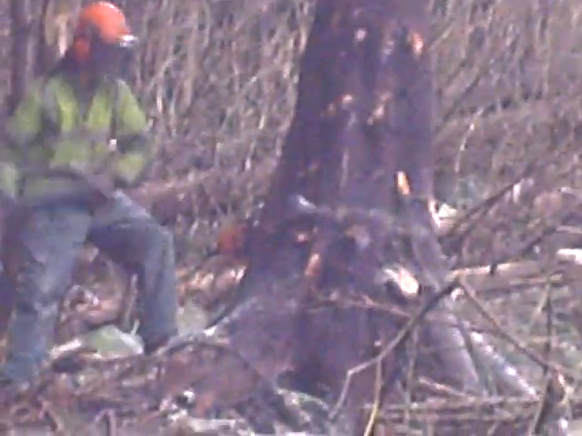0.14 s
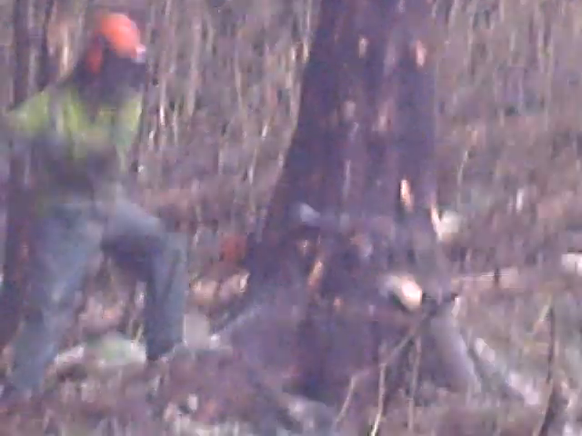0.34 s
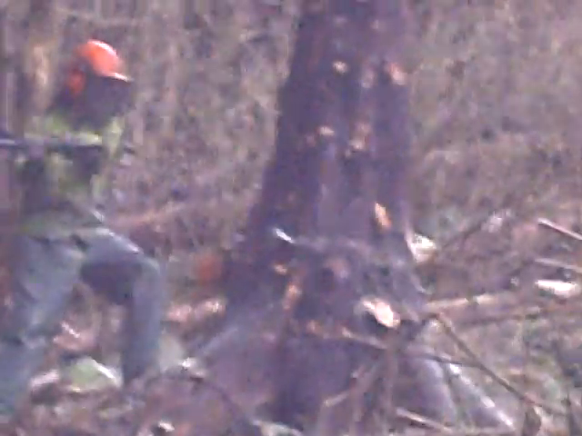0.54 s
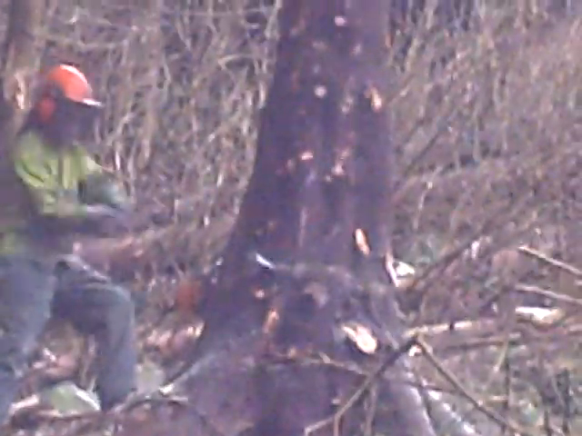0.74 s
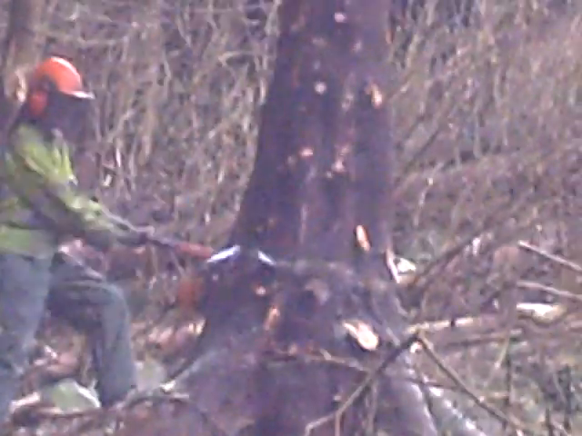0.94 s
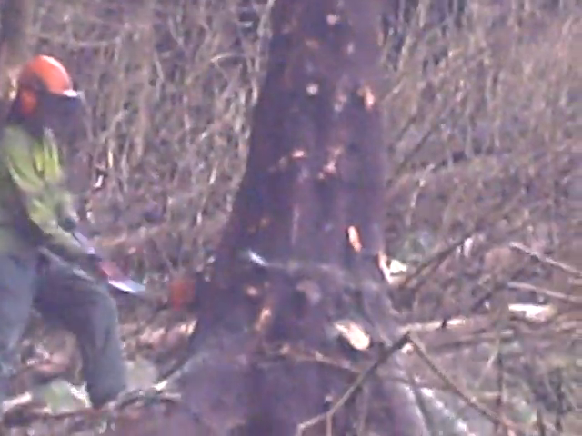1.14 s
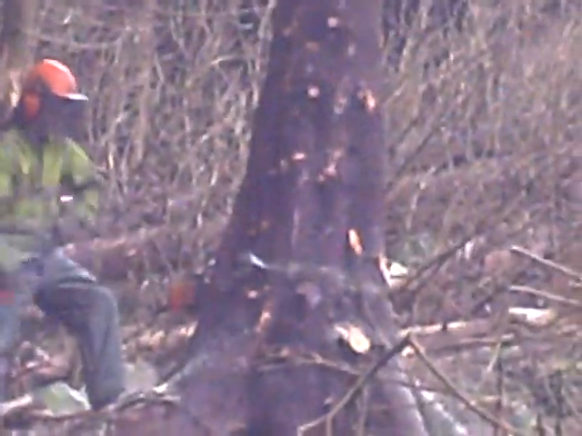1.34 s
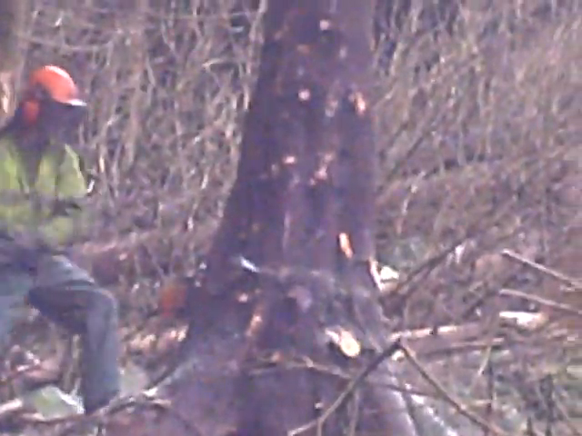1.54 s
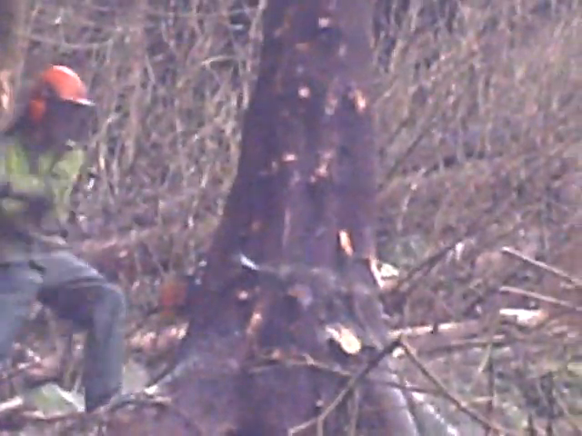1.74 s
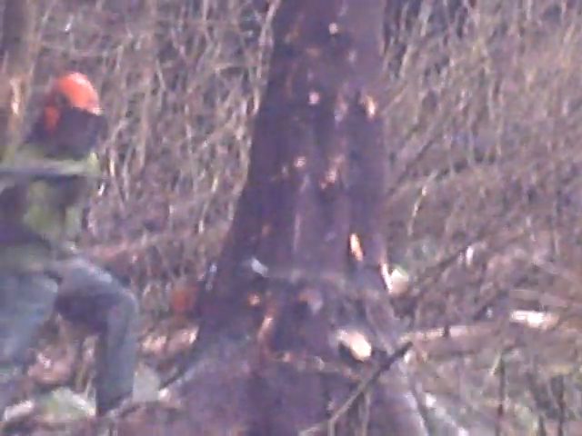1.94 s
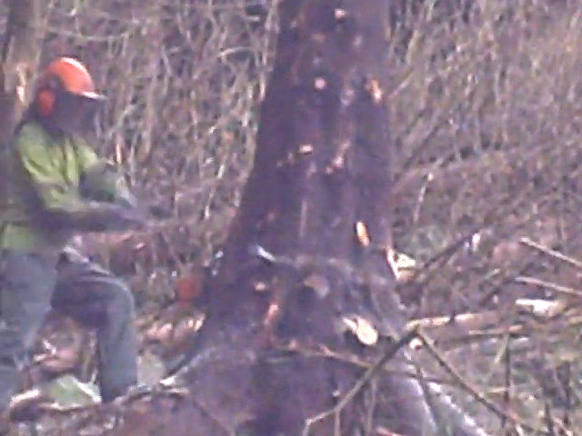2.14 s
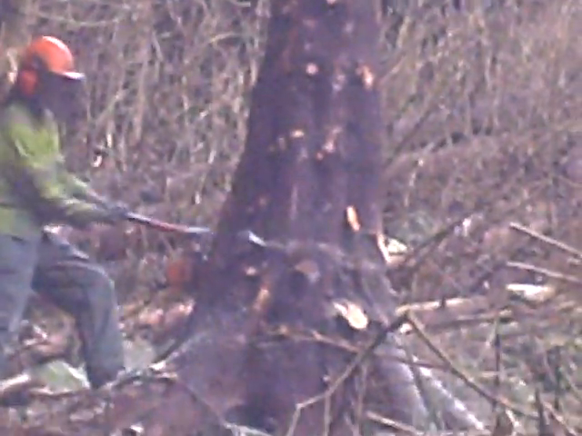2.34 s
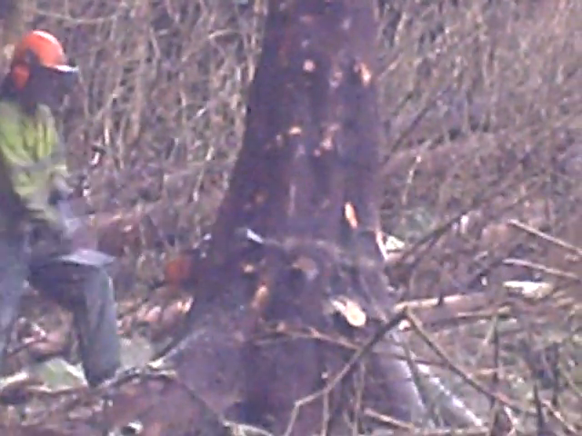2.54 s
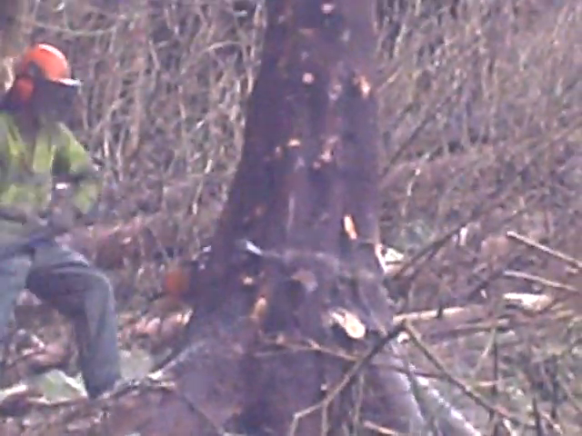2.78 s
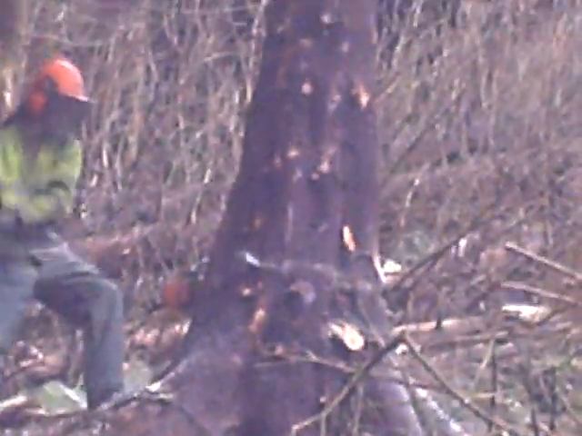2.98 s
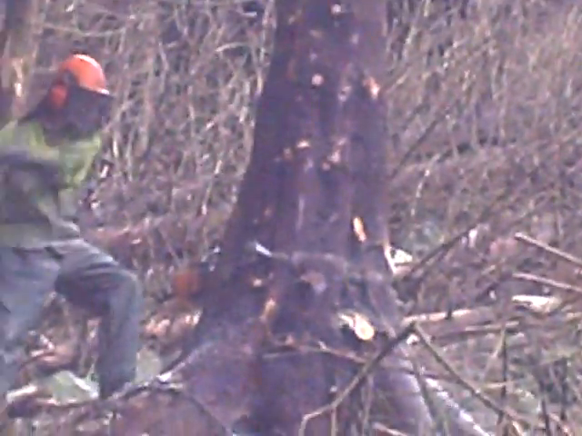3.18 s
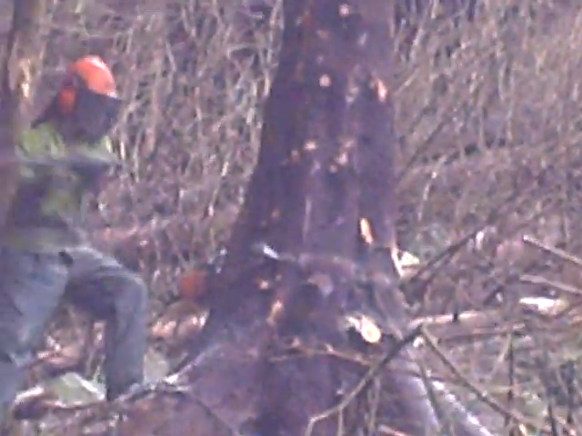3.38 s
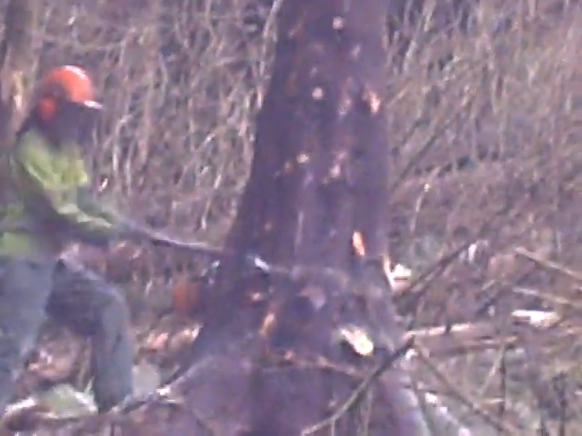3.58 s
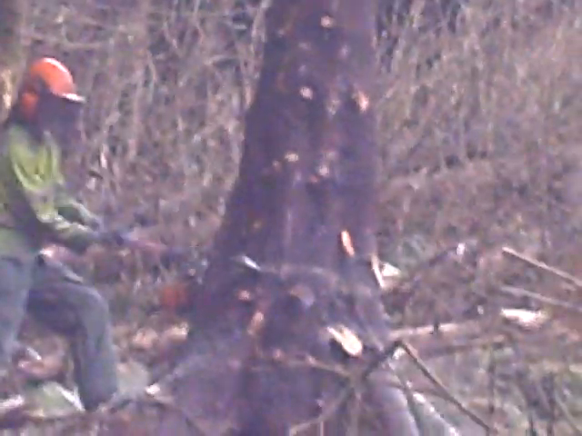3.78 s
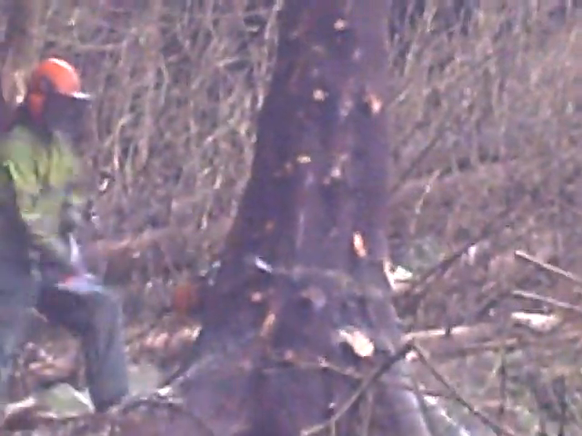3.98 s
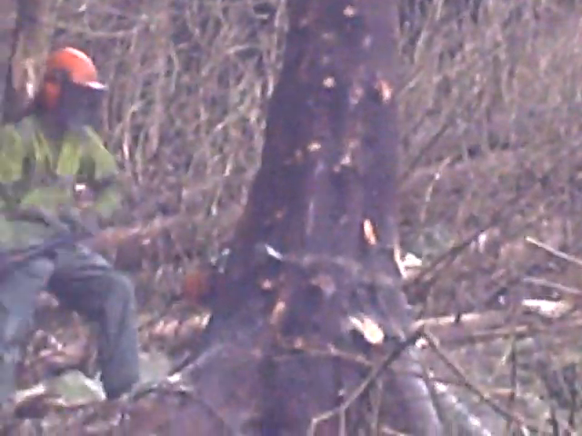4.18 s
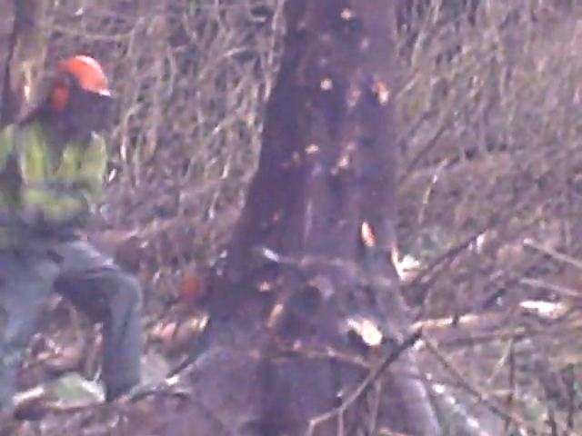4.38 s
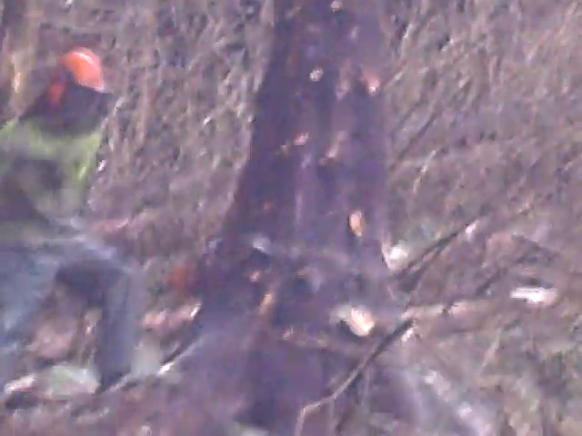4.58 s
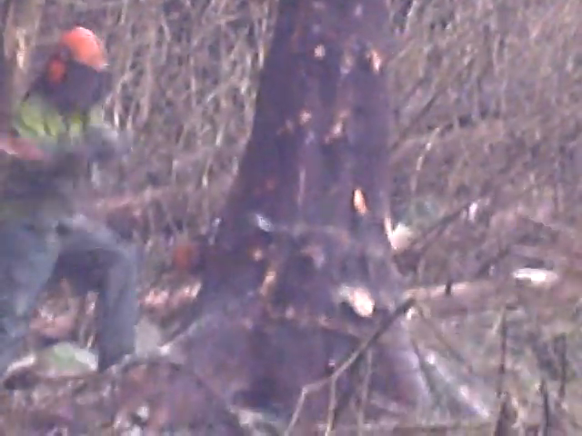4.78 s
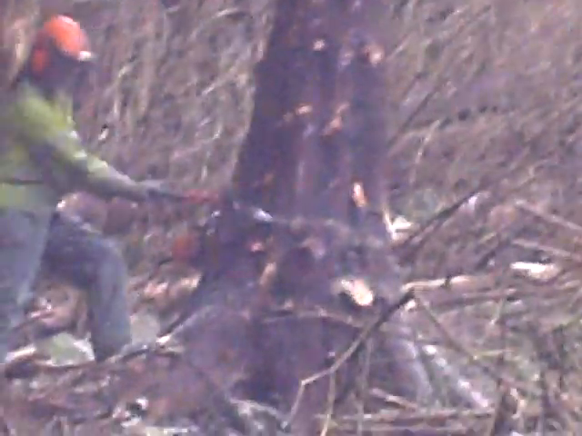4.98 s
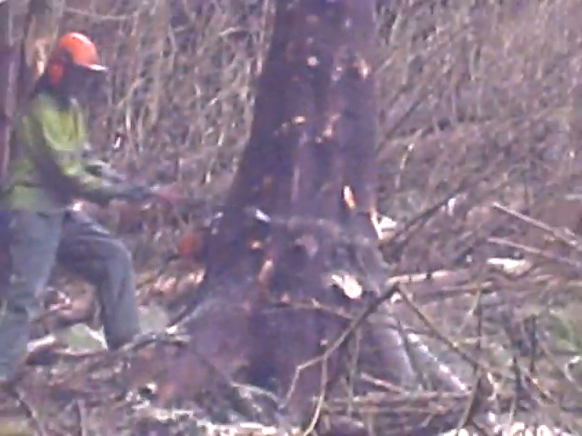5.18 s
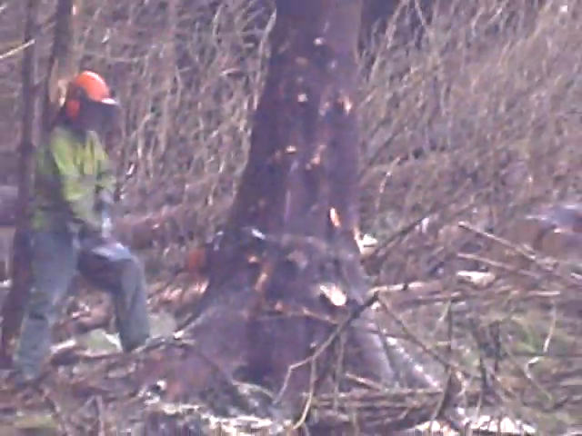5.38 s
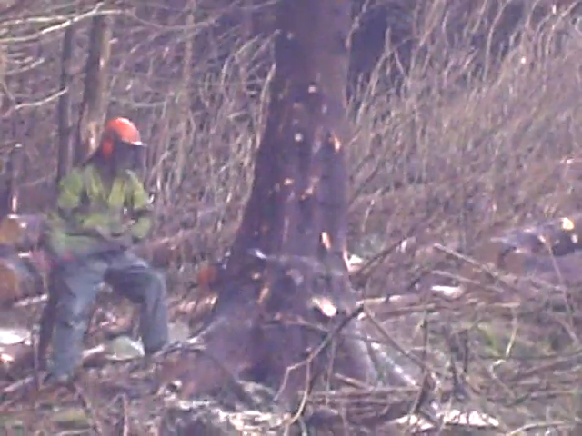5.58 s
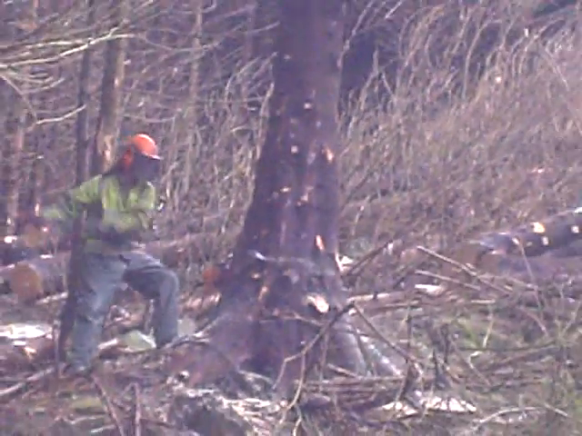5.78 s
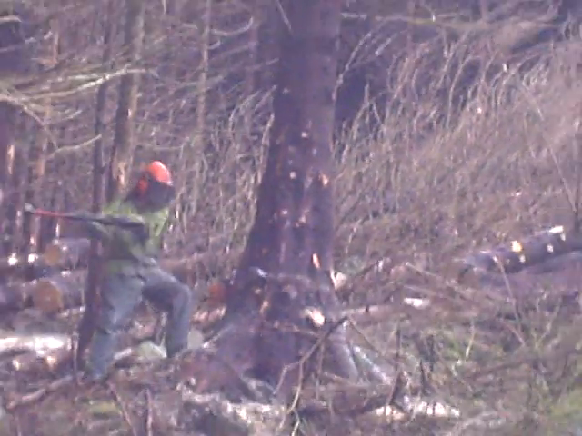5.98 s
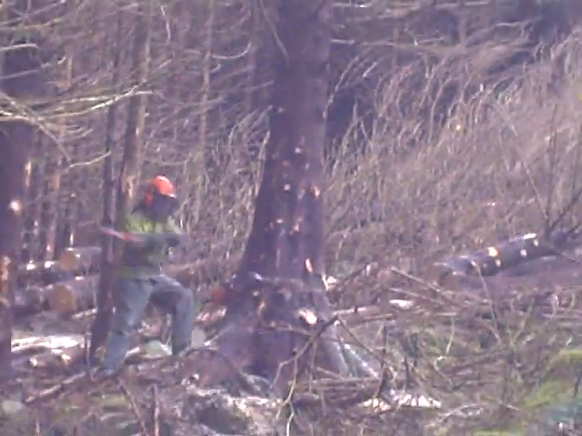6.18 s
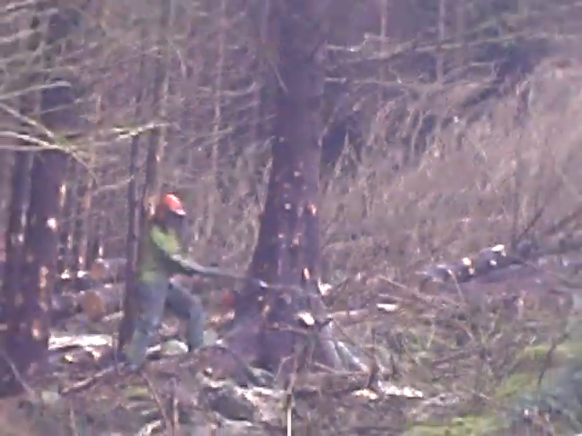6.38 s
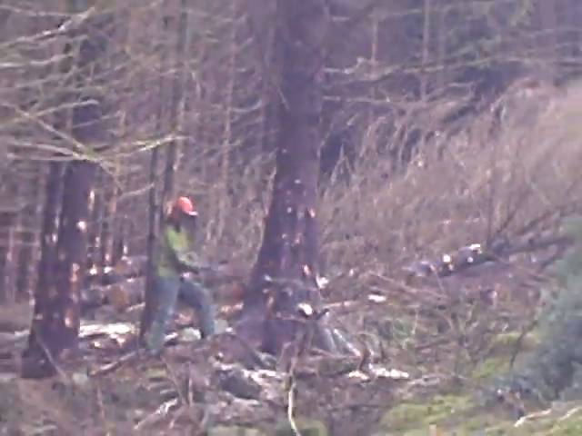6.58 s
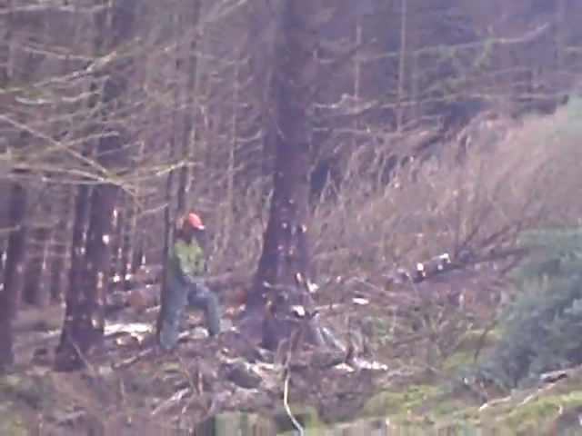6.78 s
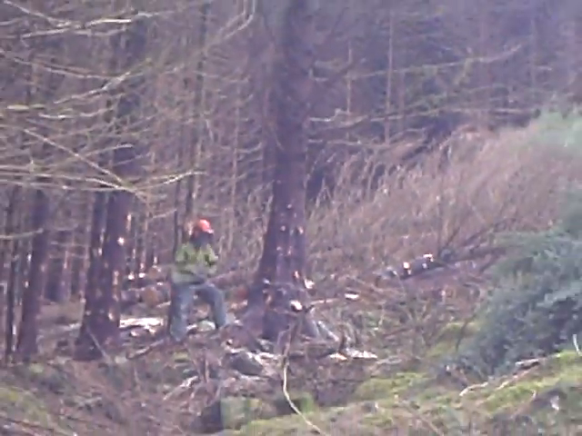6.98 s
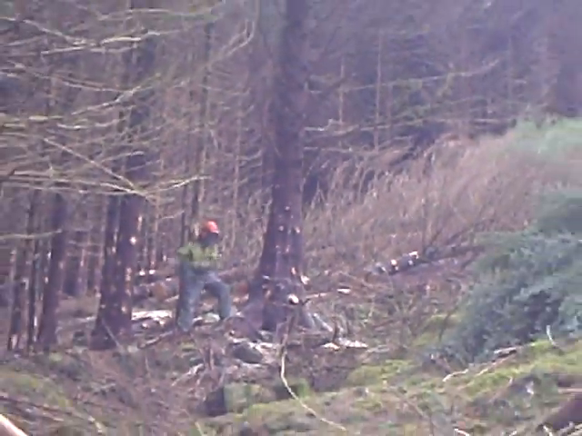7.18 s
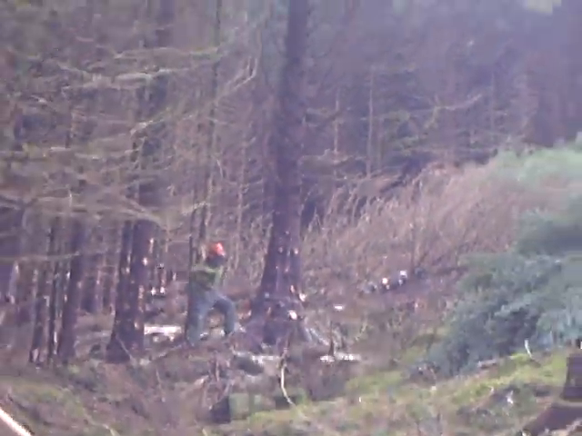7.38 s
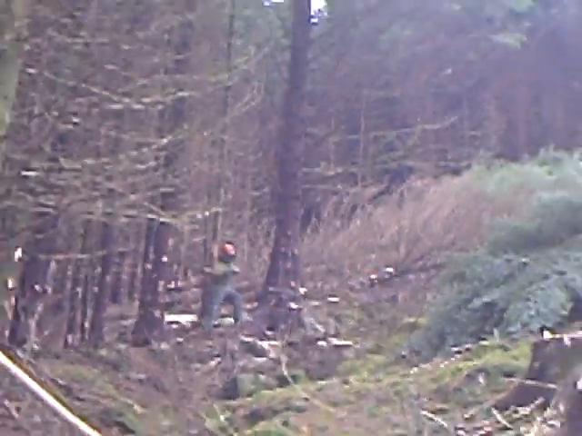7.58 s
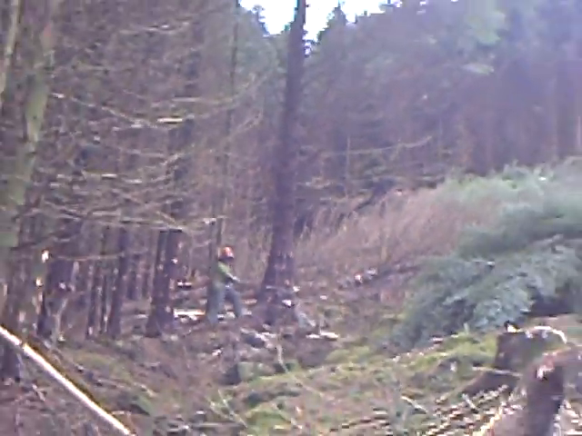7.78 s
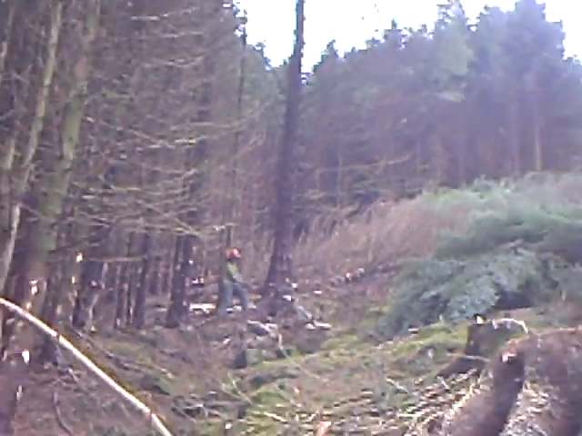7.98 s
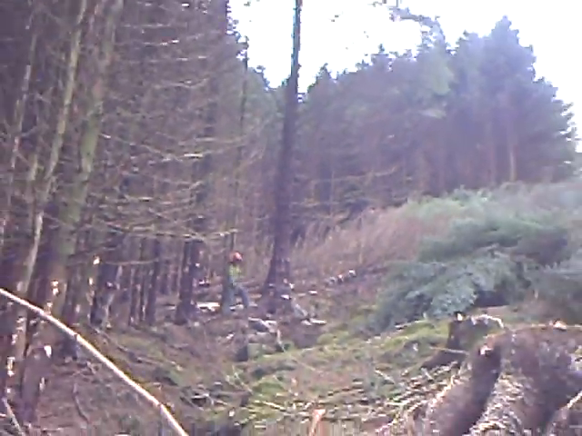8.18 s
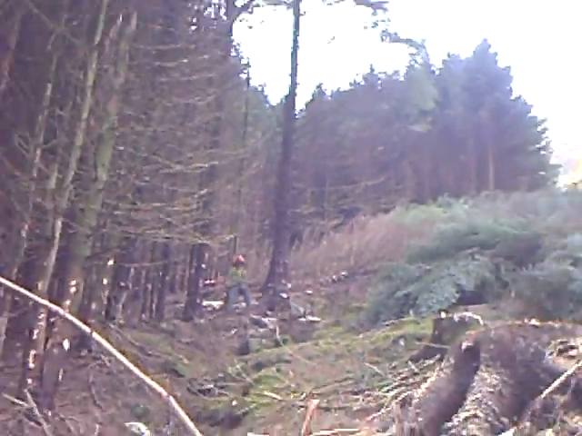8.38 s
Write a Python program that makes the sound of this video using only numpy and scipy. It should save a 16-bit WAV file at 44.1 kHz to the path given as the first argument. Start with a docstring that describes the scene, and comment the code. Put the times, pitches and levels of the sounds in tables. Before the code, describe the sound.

Six steady hammer blows clink on a steel wedge in a tree, echoing through the forest over a faint engine hum and an idling chainsaw.

```python
"""Felling wedge on a wooded hillside

Close to the microphone, a forester drives a wedge into a conifer: six steady hammer blows, loud
enough to overload it. Each is a short steel clink over a woody crack, scattered back by the trunks;
dull far echoes follow the fourth and sixth. Beneath them an engine hums far off, an idling saw jingles
its chain, and a light breeze moves the trees, with soft low rustles early on, a tick and a faint whine."""
import sys
import numpy as np
from scipy import signal
from scipy.fft import rfft, irfft, next_fast_len
from scipy.io import wavfile
from scipy.ndimage import map_coordinates

SR = 44100
rng = np.random.default_rng(int(sys.argv[2]) if len(sys.argv) > 2 else 0)


def store_wav(level_fs):
    """Save 16-bit WAV to argv[1]."""
    pcm = np.round(np.clip(np.atleast_2d(level_fs), -1, 1) * 32767)
    wavfile.write(sys.argv[1], SR, pcm.T.astype(np.int16))


N = 371763
TIME = np.arange(N) / SR


def hammer(ring_t60=0.06, clank_t60=0.023, knock_t60=0.043, grip_t60=0.081):
    """Close by, each blow cracks the wood and rings the steel; where it lands picks the top tones."""
    # the blows: (time [s], strength [dB], ring [Hz], clank [Hz], trunk knock [Hz],
    # then relative levels: ring [dB], clank [dB], low ring [dB], knock [dB])
    blows = [(1.0605, -4.5, 5910, 4163, 2027, -5, -0.5, -24.5, -7.5),
             (2.421, -3.5, 5280, 4190, 1340, -3, -7, -12, -11),
             (3.797, -3.5, 5260, 4540, 253, -9, -9, -11.5, -13.5),
             (5.1573, -3.5, 5350, 4700, 720, -10, -3, -10, -13),
             (6.547, -3.5, 5180, 4246, 1400, 1, -10.5, -10, -8),
             (7.9436, -3, 5184, 4330, 388, -2, -12.5, -8, -12.5)]
    # modes of hammer head and wedge: (frequency [Hz], relative level [dB], ungripped t60 [s])
    steel_modes = [(1597, -15.5, 0.028), (2010, -28.5, 0.046), (3980, -17, 0.066), (4180, -9, 0.035),
                   (4616, -9, 0.033), (5056, -10.5, .04), (5550, -13, 0.052), (5630, -9.5, 0.044),
                   (7040, -16.5, 0.046)]
    # a close pair that grows as the wedge seats: (frequency [Hz], relative level [dB], ungripped t60 [s])
    low_ring = [(2882, -1, 0.057), (3073, -5, 0.044)]
    # wood cracking under the wedge: (frequency [Hz], spectral level [dB])
    crack_spectrum = [(100, -3), (250, -5.5), (700, -4), (1500, -3.5), (2400, -3.5), (3500, -1),
                      (5000, 4.5), (6200, -1), (8000, -1.5)]
    track, t = np.zeros(N), np.arange(SR // 4) / SR
    attack = 1 - np.exp(-t / 0.00023)
    grip = fade(t, grip_t60)  # the wood grips the wedge and stops it quickly
    for s, db, ring_hz, clank_hz, knock_hz, ring_db, clank_db, low_db, knock_db in blows:
        modes = steel_modes + [(ring_hz, ring_db, ring_t60)]
        modes += [(hz, level + low_db, t60) for hz, level, t60 in low_ring]
        steel = amp(5.5) * ring(modes, t)
        clank = amp(13) * ring([(clank_hz, clank_db, clank_t60)], t)
        knock = ring([(knock_hz, knock_db, knock_t60)], t)
        crack = amp(3.5) * noise(crack_spectrum, size=len(t)) * fade(t, 0.065)
        add(track, s, amp(db) * ((steel + clank + crack) * grip + knock) * attack)
        # the trunks return sound sent out in all directions, so their answer is smooth and dense
        colour = lambda hz: np.sqrt(resonances(modes, hz) + amp(along(crack_spectrum, hz) - 29.5) ** 2)
        add(track, s, amp(db + 16.45) * forest_echo(colour))
    return track


def forest_echo(colour, near_db=4.0, near_t60=0.11, spread_db=6):
    """Echoes of uneven size: a quick cluster from the ground and near trunks, then the hillside."""
    # decay among the trees: (frequency [Hz], t60 [s])
    decay_times = [(200, 0.56), (1000, 0.52), (3000, 0.54), (5000, 0.45), (8000, 0.45)]
    size = SR * 3 // 4
    t = np.arange(size) / SR
    reflections = unit(rng.standard_normal(size) * amp(spread_db * rng.standard_normal(size)))
    hz, frame_times, bands = signal.stft(filtered(reflections, colour), SR, nperseg=256)
    decay = fade(frame_times, along(decay_times, hz)[:, None])
    hillside = signal.istft(bands * decay, SR, nperseg=256)[1][:size]
    near_boost = 1 + amp(near_db) * fade(t, near_t60)
    return hillside * near_boost * (1 - np.exp(-t / 0.00059))


def far_engine(firing_hz=70, drift=0.00817, rumble_db=-40.5):
    """An engine far off at a steady speed: low firing orders, a rumble and fluttering machine tones."""
    # its hum at the microphone: (time [s], level [dB])
    hum_levels = [(0, -36.5), (1.6, -34.5), (5.6, -36.5), (8.43, -36)]
    # firing orders: (multiple of the firing rate, relative level [dB])
    orders = [(1, 0.5), (2, -7.5), (3, -23.5)]
    # faint machine tones: (frequency [Hz], level [dB], flutter [share of pitch])
    machine_tones = [(300.6, -55, .004), (1180, -53, .014)]
    # its rumble: (frequency [Hz], spectral level [dB])
    rumble_spectrum = [(15, -12.5), (28, -6.5), (48, -4), (90, -3.5), (108, -11.5), (120, 4), (150, -2.5),
                       (180, -9.5), (260, -27.5)]
    phase = wavering_phase(firing_hz, drift, rate=4)
    hum = sum(amp(db + 0.5 * k * wobble(4.8)) * np.sin(round(k) * phase) for k, db in orders)
    tones = sum(amp(db + 2 * wobble(8.2)) * np.sin(wavering_phase(hz, flutter, rate=60))
                for hz, db, flutter in machine_tones)
    hum_gain = amp(curve(hum_levels) + 0.4 * wobble(3.3))
    return hum_gain * unit(hum) + tones + amp(rumble_db) * noise(rumble_spectrum)


def idling_saw(idle_hz=48.4, shake_t60=0.04):
    """Every firing shakes the loose chain by a different amount, and it jingles on the bar."""
    # how hard the chain jingles: (time [s], relative level [dB])
    jingle_levels = [(0.0, -42), (1.03, -40.5), (1.43, -39), (1.67, -37.5), (2.32, -42), (2.6, -41),
                     (3.43, -42.5), (3.83, -39), (4.81, -42.5), (7.61, -43), (8.1, -40.5), (8.43, -42)]
    # resonances of chain and bar: (frequency [Hz], width [Hz], relative level [dB])
    bar_modes = [(4212, 58, 4.5), (4400, 170, -2), (4614, 220, -2), (4770, 300, -31), (5660, 210, -13),
                 (6110, 2700, -22.5)]
    turns = wavering_phase(idle_hz, 0.016, rate=8) / (2 * np.pi)
    firings = np.diff(np.floor(turns), prepend=0) * amp(rng.uniform(-5, 5, N))
    t = np.arange(SR // 10) / SR
    jolt = fade(t, shake_t60) * (1 - np.exp(-t / 0.0041))
    shake = signal.fftconvolve(firings, jolt)[:N]
    links = (unit(shake) + 1) * rng.standard_normal(N)  # the jolts ride on a steady rattle
    bar = lambda hz: sum(amp(db) * 1j * hz * width / (centre ** 2 - hz ** 2 + 1j * hz * width)
                         for centre, width, db in bar_modes)
    return amp(curve(jingle_levels) + 1.97 + 1.8 * wobble(8.9)) * unit(filtered(links, bar))


def chain_clinks(taps_per_s=8.3, level_db=-37.5, spread_db=4.5, t60=0.016):
    """Now and then a single link gives the bar a faint bright tap."""
    # one link on the bar: (frequency [Hz], spectral level [dB])
    clink_spectrum = [(1500, -22), (4000, -7.5), (6000, -2), (8000, 5)]
    taps = (rng.random(N) < taps_per_s / SR) * amp(level_db + spread_db * rng.uniform(-1, 1, N))
    decay = fade(np.arange(SR // 20) / SR, t60)
    return signal.fftconvolve(taps, decay)[:N] * noise(clink_spectrum)


def wind(gust_db=-46, gust_follows=0.54, hiss_db=-40.5):
    """One wind strength drives the breeze in the trees and its low gusts, over a steady hiss."""
    # the breeze dies down, then holds: (time [s], level [dB])
    breeze_levels = [(0, -41.5), (1.3, -42), (4.3, -46.2), (8.43, -46)]
    # breeze in the trees, low gusts and hiss, each: (frequency [Hz], spectral level [dB])
    breeze_spectrum = [(200, -16.5), (480, -3), (700, -1), (1000, -1.5), (1200, 0), (1450, -6.5),
                       (1900, -15.5), (3000, -45)]
    gust_spectrum = [(100, -25.5), (170, -1), (250, -0.5), (350, 0.5), (450, -2), (650, -15.5),
                     (1200, -34.5)]
    hiss_spectrum = [(500, -19.5), (1400, -2.5), (1850, 0), (2300, 5.5), (2800, 2.5), (3300, 4.5),
                     (3800, -2), (5000, 6.5), (5900, -1), (8000, -5)]
    breeze_db = curve(breeze_levels)
    breeze = amp(breeze_db + 0.9 * wobble(6)) * noise(breeze_spectrum)
    lift_db = gust_follows * (breeze_db - breeze_db.mean())
    gusts = amp(gust_db + lift_db + 1.16 * wobble(7.4)) * noise(gust_spectrum)
    return breeze + gusts + amp(hiss_db) * noise(hiss_spectrum)


def dry_tick():
    """A small dead knock beside the microphone, too near and weak to raise an echo."""
    # the tick: (time [s], strength [dB])
    ticks = [(5.0429, -8)]
    # its modes: (frequency [Hz], relative level [dB], t60 [s])
    modes = [(380, -20, 0.0074), (840, -6.5, 0.0075), (1200, -5, 0.012), (3640, -9, 0.0075),
             (4560, -8, 0.0062), (6770, -3, 0.0061)]
    track, t = np.zeros(N), np.arange(SR // 20) / SR
    knock = sum(amp(db) * fade(t, t60) * np.cos(2 * np.pi * hz * t) for hz, db, t60 in modes)
    for s, db in ticks:
        add(track, s, amp(db) * knock)
    return track


def rustles_and_far_echoes(width_octaves=0.81):
    """Noise swells: soft low rustles early on, and dull far echoes after the fourth and sixth blows."""
    # three rustles, then two echoes: (time [s], level [dB], band centre [Hz], half length [s])
    swells = [(.516, -38, 199, 0.077), (3.14, -40, 330, 0.11), (3.656, -43, 332, 0.14),
              (5.438, -42.5, 796, 0.057), (8.15, -41, 650, 0.068)]
    track = np.zeros(N)
    for s, db, centre, half_length in swells:
        band = lambda hz: np.exp(-(np.log2((hz + 1) / centre) / width_octaves) ** 2)
        track += amp(db) * swell(s, half_length) * unit(filtered(rng.standard_normal(N), band))
    return track


def far_whine(pitch_hz=322, flicker_db=1.2):
    """A faint wavering tone in the distance that swells three times early on."""
    # its swells: (time [s], level [dB], half length [s])
    swells = [(.68, -40.5, 0.14), (1.08, -42, 0.13), (1.39, -42.5, .1)]
    envelope = sum(amp(db) * swell(s, half_length) for s, db, half_length in swells)
    phase = wavering_phase(pitch_hz, 0.012, rate=27)
    return envelope * amp(flicker_db * wobble(10)) * np.sin(phase)


def amp(db):
    """Decibels to gain."""
    return 10 ** (np.asarray(db) / 20)


def unit(x):
    """Scale to rms 1."""
    return x / np.sqrt(np.mean(x ** 2) + 1e-20)


def along(points, hz):
    """(frequency [Hz], value) points read on a log axis."""
    frequencies, values = np.transpose(points)
    return np.interp(np.log(hz + 1), np.log(frequencies + 1), values)


def curve(points):
    """(time [s], value) points read at every sample."""
    return np.interp(TIME, *np.transpose(points))


def wobble(rate):
    """A smooth random curve, rate knots a second."""
    return map_coordinates(rng.standard_normal(int(N * rate / SR) + 4), [TIME * rate])


def wavering_phase(hz, share, rate):
    """Phase in radians of a tone that wanders by a share of its pitch."""
    return 2 * np.pi * np.cumsum(hz * (1 + share * wobble(rate))) / SR


def filtered(x, response):
    """Shape x by a gain that depends on frequency."""
    size = next_fast_len(len(x) + 8192)
    return irfft(rfft(x, size) * response(np.fft.rfftfreq(size, 1 / SR)), size)[:len(x)]


def noise(spectrum, size=N):
    """Coloured noise of rms 1."""
    return unit(filtered(rng.standard_normal(size), lambda hz: amp(along(spectrum, hz))))


def fade(t, t60):
    """A decay of 60 dB in t60 seconds."""
    return np.exp(-np.log(1000) * t / t60)


def swell(s, half_length):
    """A smooth rise and fall that peaks at time s."""
    return np.exp(-((TIME - s) / half_length) ** 2)


def ring(modes, t):
    """Damped sines, each starting in its own direction."""
    return sum(rng.choice([-1, 1]) * amp(db) * fade(t, t60) * np.sin(2 * np.pi * hz * t)
               for hz, db, t60 in modes)


def resonances(modes, hz, width_hz=105):
    """Power spectrum of a set of modes, each a broad bump."""
    return sum(amp(2 * db) * t60 / (1 + ((hz - centre) / width_hz) ** 2) ** 2
               for centre, db, t60 in modes)


def add(track, s, sound):
    """Mix a sound into a track at time s."""
    part = track[round(s * SR):][:len(sound)]
    part += sound[:len(part)]


def scene():
    """Everything that reaches one microphone near the tree."""
    mix = (hammer() + dry_tick() + far_engine() + far_whine()
           + idling_saw() + rustles_and_far_echoes() + wind() + chain_clinks())
    return mix[None]


def record(dry, ceiling=0.73, hardness=7, top_hz=16400):
    """A dull microphone whose amplifier clips on each blow, then the band limit."""
    # microphone response and roll-off after the amplifier, each: (frequency [Hz], gain [dB])
    microphone = [(5800, -0.5), (6500, -4), (7000, -8), (7500, -14), (8000, -23), (8400, -37), (8900, -98)]
    roll_off = [(10000, 0), (16000, -14.0)]
    dull = filtered(dry[0], lambda hz: amp(along(microphone, hz)))
    clipped = dull / (1 + np.abs(dull / ceiling) ** hardness) ** (1 / hardness)
    return filtered(clipped, lambda hz: amp(along(roll_off, hz)) * (hz < top_hz))[None]


dry = scene()
out = record(dry)
store_wav(out)
```